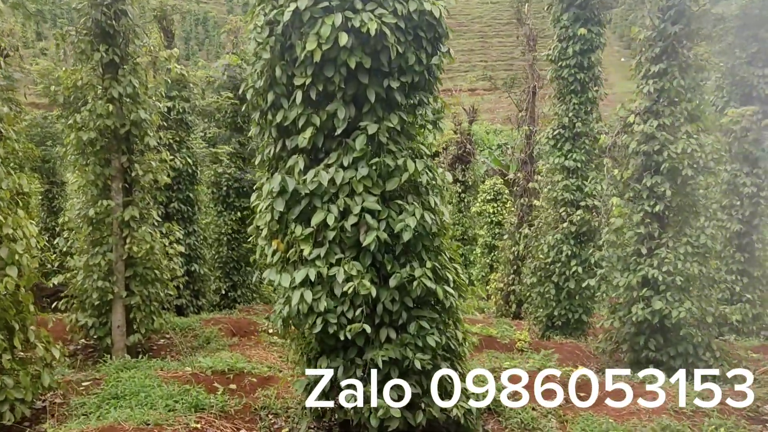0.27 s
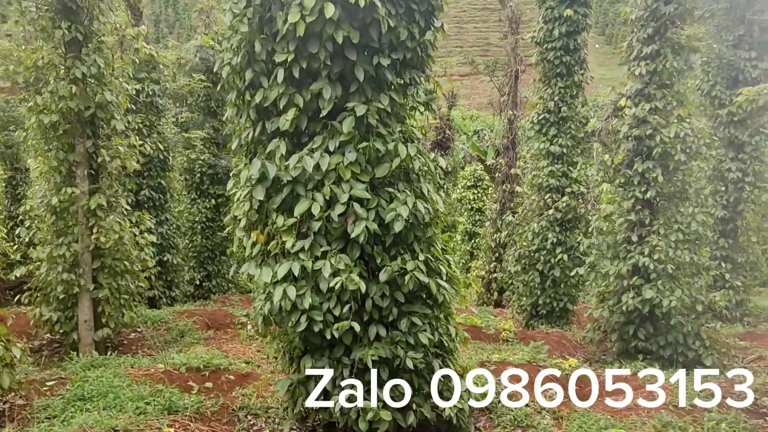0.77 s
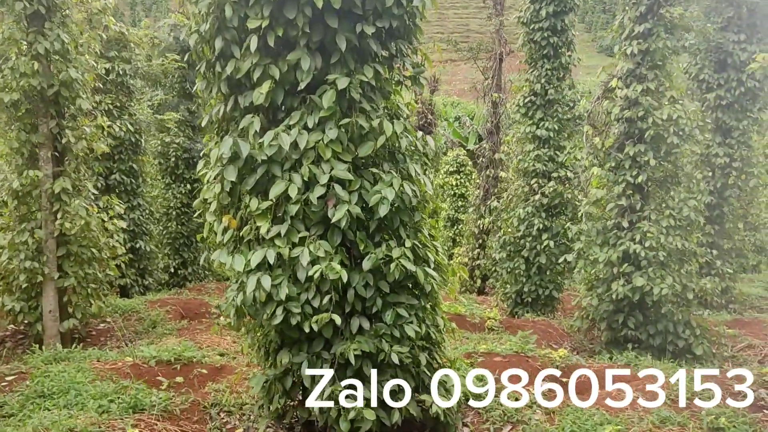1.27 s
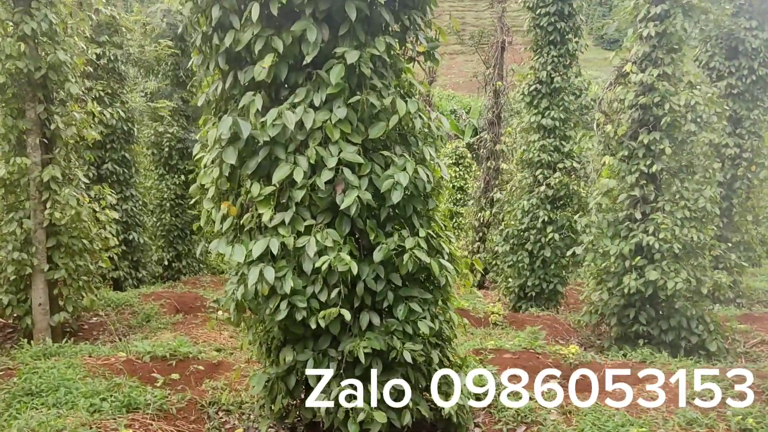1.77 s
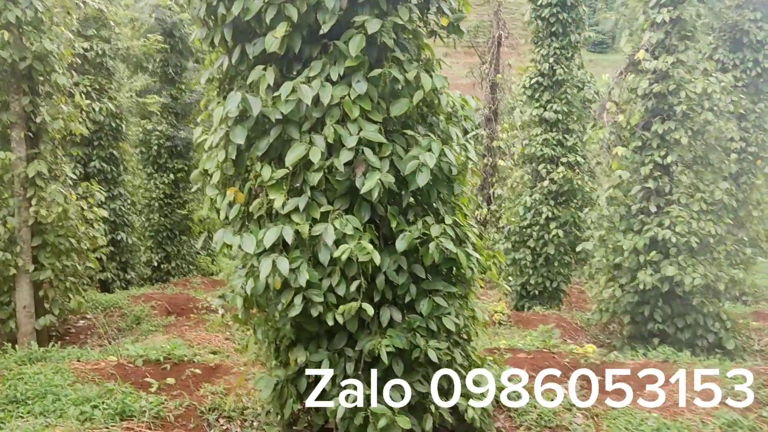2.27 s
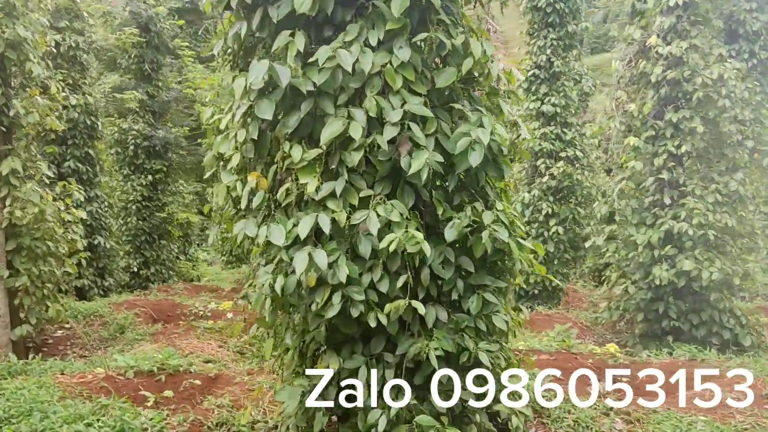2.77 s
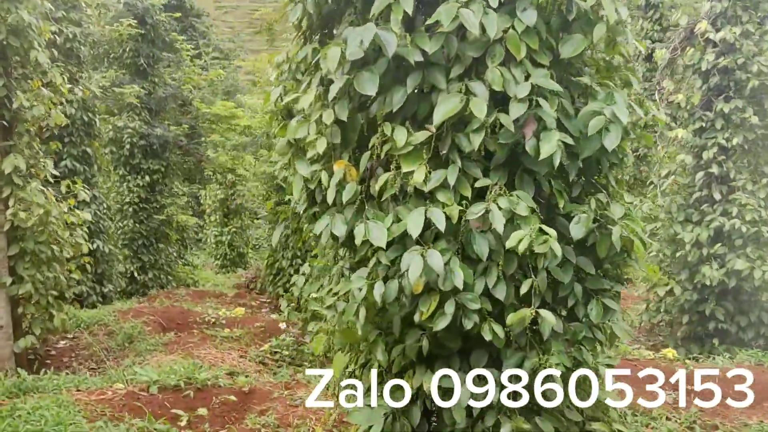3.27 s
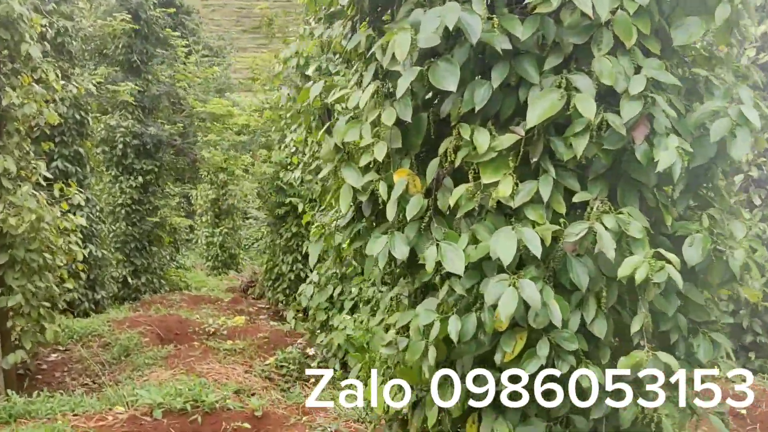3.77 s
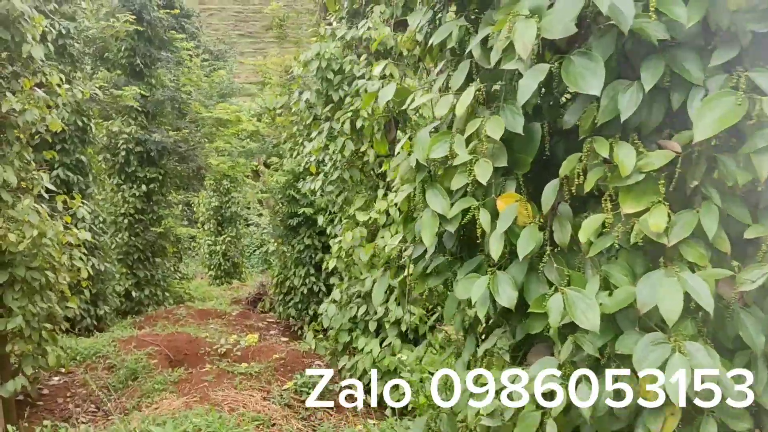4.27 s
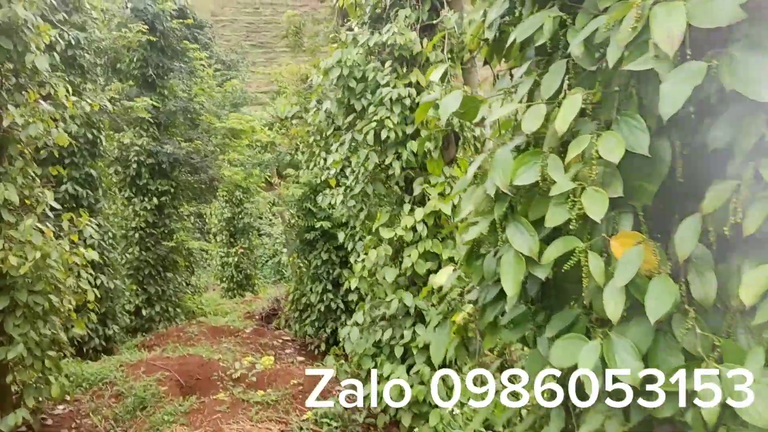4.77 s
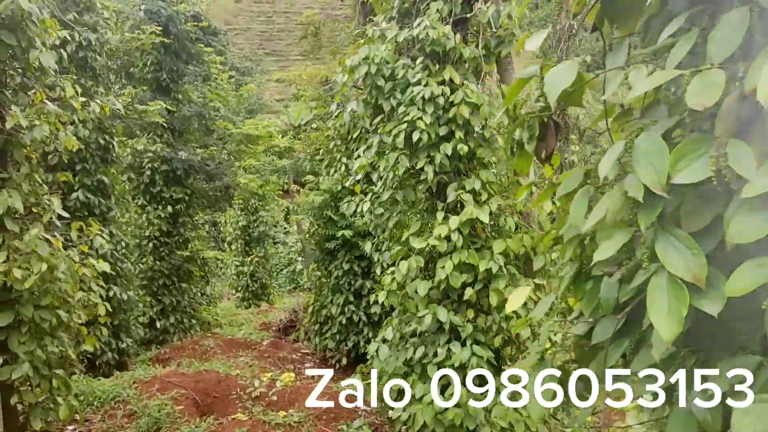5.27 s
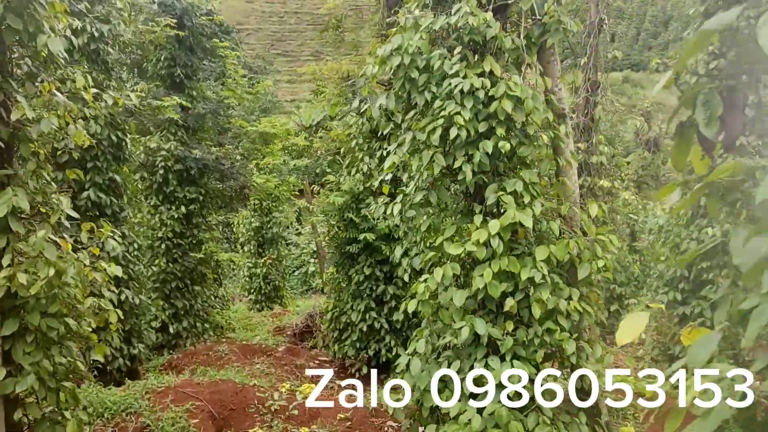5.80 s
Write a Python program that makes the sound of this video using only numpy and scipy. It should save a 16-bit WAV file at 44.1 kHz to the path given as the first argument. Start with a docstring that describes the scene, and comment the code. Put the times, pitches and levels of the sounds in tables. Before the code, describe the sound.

A breeze rumbles on the microphone while someone walks slowly over soil and weeds, leaves rustling and twigs cracking underfoot.

```python
"""A breeze rumbles on a phone's two microphone ports and buffets the right one, over faint microphone hiss.
Someone carries the phone along a dirt path between leafy vines. Shoes and legs brush weeds and dry
leaves and soil crunches: countless tiny clicks merge into noise. Kicked pebbles ring as damped
oscillators and twigs snap in sharp impulses. The wind is turbulent pressure at the ports themselves.
Each port adds its own treble peak; separately, the treble is cut steeply above 14.2 kHz."""
import sys
import numpy as np
from scipy import signal
from scipy.fft import rfft, irfft, next_fast_len
from scipy.io import wavfile
from scipy.ndimage import uniform_filter1d

SR = 44100
rng = np.random.default_rng(int(sys.argv[2]) if len(sys.argv) > 2 else 0)


def materialize(psi):
    """Save the field psi as 16-bit PCM at rate SR to the path in sys.argv[1].

    A 1-D psi becomes a single channel; in a 2-D psi each row is a channel.
    """
    bounded = np.clip(np.atleast_2d(psi).T, -1, 1)
    quanta = np.round(bounded * 32767).astype(np.int16)
    wavfile.write(sys.argv[1], SR, quanta)


N = 266143
TIME = np.arange(N) / SR
LAG_SPREAD_S, RIGHT_LEAD_S = 0.00014, 0.00007  # between the ports; the right one is nearer the ground


def undb(db):
    return 10 ** (np.asarray(db) / 20)


def unit_rms(x):
    return x / np.sqrt(np.mean(x ** 2))


def colour(x, points):
    """Spectral shaping by (frequency [Hz], gain [dB]) points, joined on a log frequency axis."""
    size = next_fast_len(x.shape[-1] + 512)
    hz, db = np.transpose(points)
    bin_hz = np.arange(size // 2 + 1) * SR / size
    gain = undb(np.interp(np.log(bin_hz + 1), np.log(hz), db))
    return irfft(rfft(x, size) * gain, size)[..., :x.shape[-1]]


def band(x, lo_hz, hi_hz):
    sos = signal.butter(2, [lo_hz, min(hi_hz, SR / 2.2)], "band", fs=SR, output="sos")
    return signal.sosfilt(sos, x)


def wander(hz):
    """Random modulation: levels held for 1 / hz seconds and smoothed twice; standard deviation 1."""
    hold = int(SR / hz)
    steps = np.repeat(rng.standard_normal(N // hold + 1), hold)
    smooth = uniform_filter1d(uniform_filter1d(steps, hold), hold)[:N]
    return smooth / smooth.std()


def add(out, start_s, sound):
    """Superposition: mix a sound in at its start time."""
    i = int(start_s * SR)
    out[..., i:i + sound.shape[-1]] += sound[..., :max(N - i, 0)]


# Strength of the breeze: (time [s], left port level [dB], right port level [dB])
BREEZE_LEVELS = [(0.0, -42, -45), (0.11, -46, -32.5), (0.2, -46, -45.5), (0.43, -51, -51),
                 (0.74, -50, -44.5), (1.08, -45, -41.5), (1.47, -47.5, -49), (1.91, -58, -35),
                 (2.01, -47.5, -55), (2.24, -54, -41.5), (2.59, -50.5, -51), (3.02, -49.5, -31),
                 (3.35, -47.5, -33), (3.7, -45, -45.5), (3.95, -43, -32.5), (4.3, -49, -29),
                 (4.46, -50, -47.5), (4.56, -59, -36.5), (4.8, -46.5, -53), (5.3, -56.5, -49.5),
                 (5.6, -49, -51), (6.03, -53.5, -50.5)]
# Spectra of the slow and the quick eddies: (frequency [Hz], relative level [dB])
SLOW_EDDY_SPECTRUM = [(10, 4), (25, 10.5), (60, 0), (110, -33), (200, -25), (400, -36), (800, -70),
                      (3000, -120)]
QUICK_EDDY_SPECTRUM = [(30, -27), (60, 3), (90, 0), (140, -14.5), (300, -42), (1500, -110)]
def rumble():
    """Turbulence: throbbing pressure, uncorrelated at the two ports; faster air adds quicker eddies."""
    times, *port_db = np.transpose(BREEZE_LEVELS)
    db = np.array([np.interp(TIME, times, levels) for levels in port_db])
    slow = unit_rms(colour(rng.standard_normal((2, N)), SLOW_EDDY_SPECTRUM))
    quick = unit_rms(colour(rng.standard_normal((2, N)), QUICK_EDDY_SPECTRUM))
    throb = np.array([wander(hz=28.07), wander(hz=25.06)])
    quick_db = -9.0 + 0.38 * (db + 34) + 3 * throb
    return undb(db) * (slow * undb(0.26 * throb) + quick * undb(quick_db))


# Each port's treble peak, plus a separate steep cut above 14.2 kHz: (frequency [Hz], gain [dB])
LEFT_PEAK_AND_CUT = [(300, -10.5), (1000, -12.5), (3270, -13), (7750, -2.5), (9820, 2.5), (10680, 5.5),
                     (11890, 0.5), (14200, -8.5), (14500, -62), (14800, -59)]
RIGHT_PEAK_AND_CUT = [(300, -11.5), (1000, -11.5), (1890, -10), (3100, -16), (7240, -1), (8610, 5.5),
                      (11540, -10.5), (13090, -7.5), (14200, -19), (14500, -32), (14800, -56)]
def shape_treble(x):
    """Linear filtering: each port's own treble peak, plus a separate steep cut above 14.2 kHz."""
    return np.array([colour(x[0], LEFT_PEAK_AND_CUT), colour(x[1], RIGHT_PEAK_AND_CUT)])


# Spectrum of the hiss before treble shaping: (frequency [Hz], relative level [dB])
HISS_SPECTRUM = [(50, -17), (120, 12), (250, 17.5), (700, 9.5), (2000, 9), (4000, 5), (8000, -7),
                 (14000, -24)]
def microphone_hiss(level_db=-63):
    """Self noise: a faint, nearly steady hiss of the microphones, uncorrelated left and right."""
    swell_db = wander(hz=3)
    hiss = colour(rng.standard_normal((2, N)), HISS_SPECTRUM)
    return undb(level_db + swell_db) * unit_rms(shape_treble(hiss))


# Brushes of a shoe or leg through the weeds:
# (time [s], swell rate [dB/s], drag length [s], leaf level [dB], soil level [dB])
BRUSHES = [(0.067, 192, 0.043, -50.5, -61), (0.236, 93, 0.019, -51, -64), (0.562, 500, 0.3, -48, -63),
           (0.952, 200, 0.12, -52.5, -61), (1.184, 300, 0.32, -48.5, -61), (1.554, 200, 0.25, -46.5, -58.5),
           (1.7, 150, 0.22, -47, -61), (2.044, 489, 0.08, -42, -54), (2.206, 203, 0.017, -44.5, -54),
           (2.318, 200, 0.2, -52, -60), (2.981, 214, 0.074, -52, -55.5), (3.105, 150, 0.05, -54.5, -67),
           (3.213, 348, 0.072, -49.5, -58.5), (3.36, 200, 0.056, -49.5, -59), (3.507, 198, 0.15, -52, -63),
           (3.98, 245, 0.12, -54, -63), (4.177, 300, 0.054, -59, -65), (4.395, 402, 0.017, -62, -80),
           (4.67, 382, 0.022, -55.5, -68), (4.819, 250, 0.026, -54.5, -63), (4.945, 250, 0.023, -57, -67),
           (5.112, 150, 0.015, -63.5, -77), (5.233, 700, 0.012, -57, -71), (5.28, 300, 0.03, -58, -68),
           (5.453, 250, 0.036, -56, -62.5), (5.555, 200, 0.031, -56.5, -67), (5.826, 250, 0.033, -59, -83)]
def scuff_gains(sag_db_per_s=6.5, fall_db_per_s=112):
    """Exponential growth and decay: each scuff swells, sags as the foot drags and dies; powers add."""
    start, swell_rate, length, leaf_db, soil_db = np.transpose(BRUSHES)[..., None]
    since = TIME - start
    shape_db = (swell_rate * np.minimum(since, 0)
                - sag_db_per_s * np.clip(since, 0, length)
                - fall_db_per_s * np.maximum(since - length, 0))

    def gain(peak_db, floor_db):  # the floor is the weeds settling between scuffs
        return np.sqrt(np.sum(undb(shape_db + peak_db) ** 2, axis=0) + undb(floor_db) ** 2)
    return gain(leaf_db, floor_db=-66.5), gain(soil_db, floor_db=-80.5)


def grains(spread_db, count, band_hz):
    """Shot noise: tiny clicks all round the feet, each with its own path difference to the ports."""
    at = rng.integers(40, N - 40, count)
    size = undb(spread_db * rng.exponential(size=count)) * rng.choice([-1, 1], count)
    place = rng.uniform(-1, 1, count)
    lag = np.round((place * abs(place) * LAG_SPREAD_S - RIGHT_LEAD_S) * SR).astype(int)
    clicks = np.array([np.bincount(at, size, N), np.bincount(at + lag, size, N)])
    return unit_rms(shape_treble(band(clicks, *band_hz)))


def rustle(leaf_gain, soil_gain):
    """Friction noise: bright leaves, swishing stems and dull soil all flicker as the foot drags."""
    drag = wander(hz=60)
    leaves = grains(spread_db=1.5, count=45000, band_hz=(6900, SR / 2))
    stems = grains(spread_db=1.5, count=30000, band_hz=(2120, 5700))
    soil = grains(spread_db=1.0, count=14000, band_hz=(510, 2670))
    leaves *= np.sqrt(2) * leaf_gain * undb(0.6 * drag)  # the ports add incoherently in the treble
    stems *= np.sqrt(leaf_gain * soil_gain) * undb(-1.0 + 1.4 * drag + 1.8 * wander(hz=70))
    soil *= soil_gain * undb(1.35 * drag + 1.2 * wander(hz=60))
    return leaves + stems + soil


# Eddy trains at the right port: (centre time [s], level [dB], shedding rate [Hz], length [s])
EDDY_TRAINS = [(0.075, -27.5, 151, 0.019), (0.105, -33.5, 118, 0.031), (1.757, -35, 163, 0.022),
               (1.779, -31.5, 161, 0.024), (1.907, -29.5, 114, 0.064), (2.833, -35, 149, 0.034),
               (2.985, -28, 196, 0.029), (3.0442, -16.5, 387, 0.009), (3.047, -17, 189, 0.014),
               (3.062, -17, 238, 0.013), (3.092, -19, 175, 0.032), (3.119, -24.5, 172, 0.056),
               (3.154, -21.5, 164, 0.0083), (3.184, -15.5, 199, 0.012), (3.259, -23.5, 160, 0.049),
               (3.281, -21.5, 136, 0.022), (3.3095, -16, 205, 0.011), (3.384, -18.5, 104, 0.017),
               (3.4, -22.5, 121, 0.05), (3.489, -33.5, 149, 0.017), (3.851, -24, 111, 0.016),
               (3.863, -22, 123, 0.029), (3.876, -30, 130, 0.026), (3.92, -26, 126, 0.037),
               (3.995, -27.5, 136, 0.033), (4.043, -21.5, 144, 0.039), (4.11, -16, 136, 0.021),
               (4.125, -23, 117, 0.033), (4.176, -28, 143, 0.032), (4.208, -22, 151, 0.0078),
               (4.22, -18.5, 132, 0.028), (4.261, -16.5, 192, 0.0078), (4.283, -22, 136, 0.029),
               (4.316, -34.5, 128, 0.032), (4.375, -22.5, 144, 0.035)]
def buffets(rows):
    """Vortex shedding: eddies leave the port's edge unevenly; pressure peaks are sharper than dips."""
    out = np.zeros(N)
    for centre, db, hz, length in rows:
        eddy_shift, push_shift, *sway = rng.uniform(-1, 1, 8)
        t = np.arange(-length / 2, length / 2, 1 / SR)
        knots = np.linspace(t[0], t[-1], len(sway))
        size = undb(4.2 * np.interp(t, knots, np.roll(sway, 2)))
        pace = np.exp(0.42 * np.interp(t, knots, sway))
        phase = 2 * np.pi * hz * np.cumsum(pace) / SR
        phase += 0.76 * eddy_shift - phase[len(t) // 2]
        peaks = size * (np.exp(1.2 * np.cos(phase)) - 1.2)
        # the whole train rides on one slower push of air
        push = 0.8 * np.cos(2 * np.pi * 75 * t + 0.52 * push_shift)
        train = np.cos(np.pi * t / length) ** 2 * (peaks + push)
        add(out, centre + t[0], undb(db) * train / abs(train).max())
    return colour(out, [(30, 6.5), (100, 3.5), (400, -3.5), (800, -10.0), (1600, -43)])


def flutter(count, offset_db=-5, eddy_hz=126, length_s=0.019):
    """Intermittency: rows of small eddy trains at random times, scaled to the right port's breeze."""
    times, _, right_db = np.transpose(BREEZE_LEVELS)
    centres = rng.uniform(0.1, N / SR, count)
    return [(s, np.interp(s, times, right_db) + offset_db, eddy_hz, length_s) for s in centres]


def crackle(leaf_gain, count, offset_db=10, spread_db=1.5, body_db=-23, fade_ms=0.87):
    """Random point process: rows of small snaps whose levels follow the leaf rustle under them."""
    position, chance = rng.random((count, 2)).T
    rustle_db = 20 * np.log10(leaf_gain[(position * N).astype(int)])
    levels = rustle_db + offset_db - spread_db * np.log(chance)
    return [(p * N / SR, db, body_db, fade_ms, 0) for p, db in zip(position, levels) if p > 0.001]


# Twigs and dry leaves breaking:
# (time [s], level [dB], body relative to crack [dB], decay time [ms], pan to the left [dB])
FRACTURES = [(1.346, -27, -24, 0.5, 5), (1.516, -28, -20, 0.51, 14), (1.5555, -7.5, -12.5, 0.75, 7),
             (1.79, -24, -27, 0.44, 6), (2.0517, -42, -13, 1, 0), (2.6831, -36.5, -4, 0.37, 6),
             (2.8193, -41, -16, 0.78, 3), (3.1723, -32.5, -2, 4.1, -4), (3.238, -34, 4, 0.72, -2),
             (3.3537, -38, 8, 1.1, 7), (3.4828, -27.5, -28, 0.81, -5), (3.4925, -37, -14, 0.5, 3),
             (3.4993, -35, -25, 0.45, -8), (3.5015, -30, -17, 0.5, 1), (3.5105, -26.5, -2, 1.4, -4),
             (3.5119, -19, -16, 0.48, -15), (3.5248, -20, -14, 0.69, 1), (3.527, -27, -6, 0.8, 7),
             (3.5324, -31, -10, 1.3, -17), (3.5755, -24, -9, 0.57, 6), (3.586, -39, -15, 0.76, 2),
             (3.6632, -38, -5, 1.7, 9), (3.7967, -39, -2, 1.04, 4), (3.9167, -37, -5, 0.83, 6),
             (3.9395, -36.5, -23, 3.5, 1), (4.0481, -35.5, 2, 1.05, 17), (4.051, -33, -1, 3, -3),
             (4.0545, -34.5, 3, 3.8, -10), (4.0986, -35.5, -2.5, 1.6, -9), (4.205, -40, -2, 0.8, 5),
             (4.22, -37, -20, 0.87, -4), (4.226, -40, -25, 0.8, 5), (4.411, -38, -20, 0.8, 0),
             (4.4175, -34, -6.5, 3.9, -7), (4.4215, -29.5, -12, 0.78, 4), (4.439, -44, -8, 0.54, 0),
             (4.4912, -39.5, -13, 0.62, -5), (4.7698, -37, -5, 0.95, 2), (4.7785, -40, -15, 0.88, 0),
             (4.85, -34.5, -8, 0.82, 6), (5.2362, -37.5, -8, 4.5, 0), (5.2472, -36, -5, 3, -3),
             (5.2797, -38, -27, 1.1, 6), (5.293, -36.5, -23, 0.73, 5), (5.811, -44, -15, 0.8, -2),
             (5.828, -38, -5, 1.4, 0), (5.876, -45, -12, 0.8, -4)]
def snaps(rows, click_db=7):
    """Brittle fracture: a sharp crack over a duller body, then faint scattering from nearby leaves."""
    out, t = np.zeros((2, N)), np.arange(1024) / SR - 0.002
    age = np.maximum(t, 0)
    attack = 1 - np.exp(-age / 0.000067)
    scatter = undb(-22.0) * np.exp(-age / 0.0096)
    for start, db, body_db, fade_ms, pan_db in rows:
        envelope = attack * (np.exp(-age * 1000 / fade_ms) + scatter)
        own, shared = rng.standard_normal((2, len(t))), rng.standard_normal(len(t))
        shared = np.array([np.roll(shared, round(RIGHT_LEAD_S * SR)), shared])
        splinters = (own + 0.36 * shared) * envelope
        # the first break stands further above the splinters in a shorter snap
        click = undb(click_db) / fade_ms * signal.unit_impulse(len(t), np.argmax(envelope))
        top_hz = 9500 * 2 ** rng.random()  # thicker twigs are duller
        crack = shape_treble(band(band(splinters + click, 9400, SR / 2), 6400, top_hz))
        crack /= abs(crack).max(axis=1, keepdims=True)
        body = shape_treble(band(shared + 0.13 * own, 2800, 6600) * envelope)
        body *= undb(body_db) / abs(body).max()
        add(out, start + t[0], undb([[db + pan_db / 2], [db - pan_db / 2]]) * (crack + body))
    return out


# Kicked pebbles and clods: (time [s], level [dB], mode frequency [Hz])
PEBBLE_HITS = [(0.551, -42, 920), (0.924, -47, 630), (1.089, -46, 860), (1.5551, -34.5, 1500),
               (2.175, -43, 1030), (3.237, -40, 2160), (3.5325, -40, 1860), (3.575, -42, 950),
               (3.748, -35.5, 1070), (3.797, -46.5, 2150), (4.306, -50, 1290), (5.442, -47, 790),
               (5.467, -46, 800), (5.523, -50, 1300), (5.635, -46, 1760), (5.951, -49, 860)]
def knocks():
    """Damped oscillation: a kicked pebble or clod rings briefly in one mode, nearer the right port."""
    out, t = np.zeros(N), np.arange(1024) / SR
    envelope = (1 - np.exp(-t / 0.00038)) * np.exp(-t / 0.00064)
    for start, db, hz in PEBBLE_HITS:
        ring = envelope * np.sin(2 * np.pi * hz * t)
        add(out, start, undb(db) * ring / abs(ring).max())
    left = np.roll(out, round(RIGHT_LEAD_S * SR))
    return np.array([left, out]) * undb([[-1.3], [1.3]])


def scene():
    """Superposition: footsteps, microphone hiss and wind add in the two channels."""
    leaf_gain, soil_gain = scuff_gains()
    twigs = snaps(FRACTURES + crackle(leaf_gain, count=120))
    lean_right = undb([[-0.325], [0.325]])
    feet = (rustle(leaf_gain, soil_gain) + twigs) * lean_right + knocks()
    wind = rumble()
    wind[1] += buffets(EDDY_TRAINS + flutter(count=90))
    return feet + microphone_hiss() + wind


def record(dry):
    """Band limiting: the phone's steep low-pass filter removes the highest treble."""
    cutoff_hz = 15600
    return signal.sosfilt(signal.ellip(8, 0.2, 70, cutoff_hz, fs=SR, output="sos"), dry)


dry = scene()
out = record(dry)
materialize(out)
```